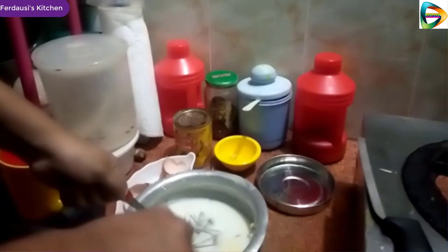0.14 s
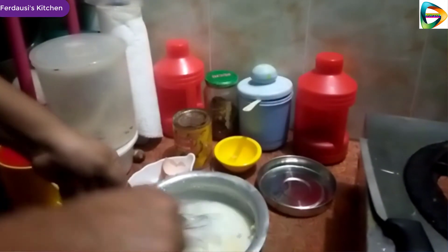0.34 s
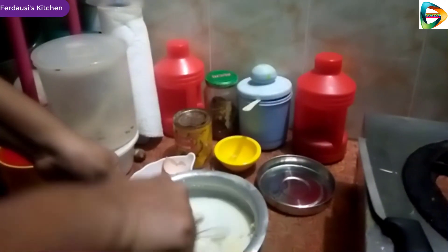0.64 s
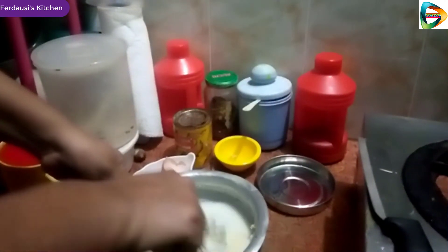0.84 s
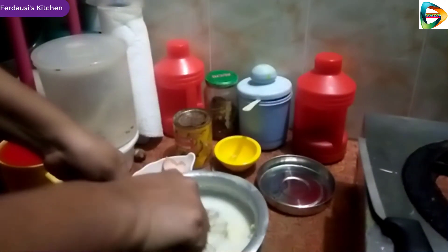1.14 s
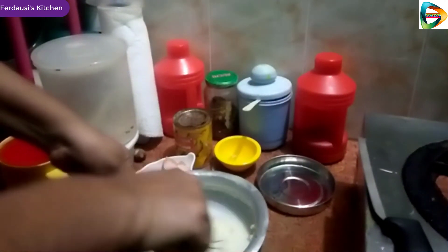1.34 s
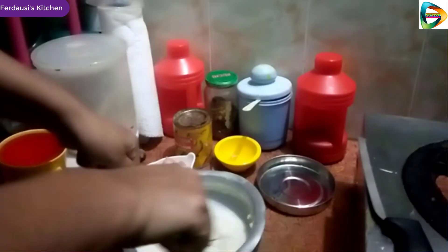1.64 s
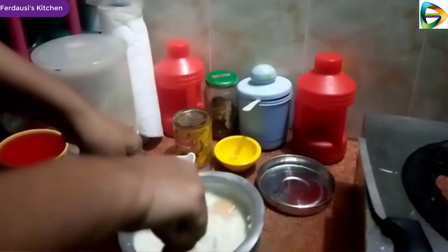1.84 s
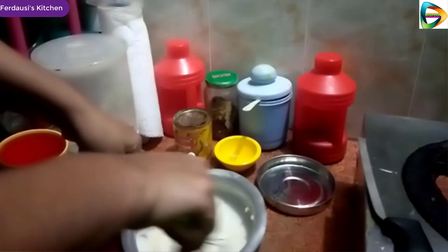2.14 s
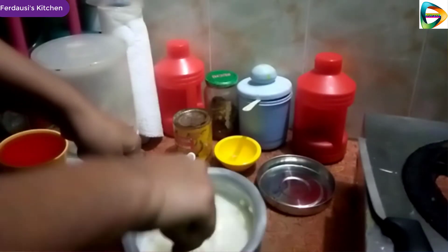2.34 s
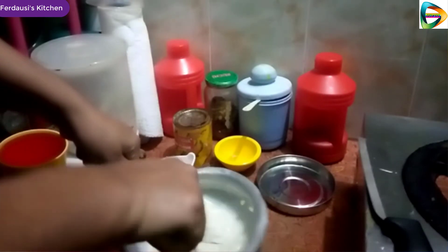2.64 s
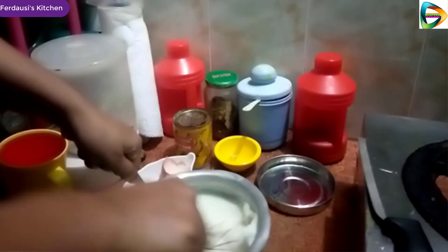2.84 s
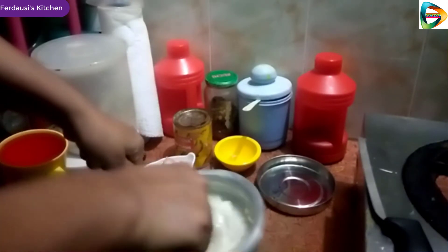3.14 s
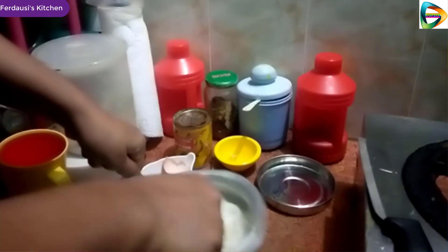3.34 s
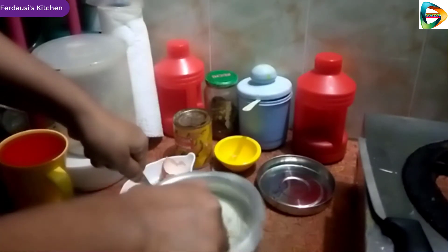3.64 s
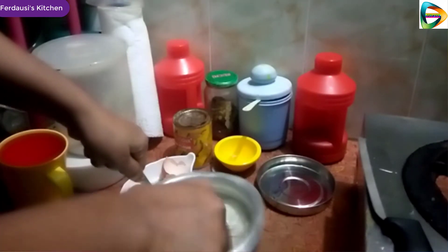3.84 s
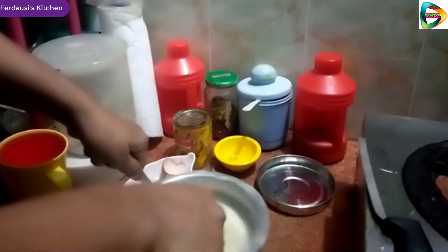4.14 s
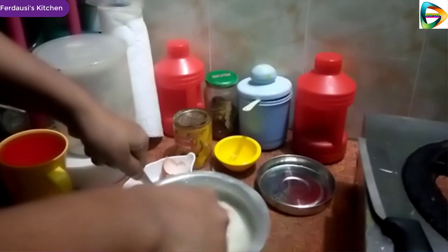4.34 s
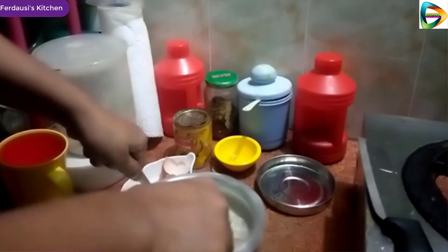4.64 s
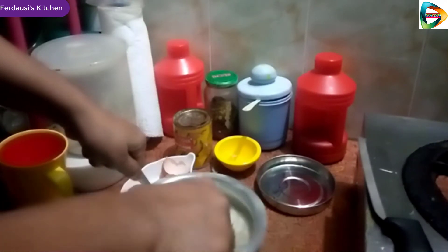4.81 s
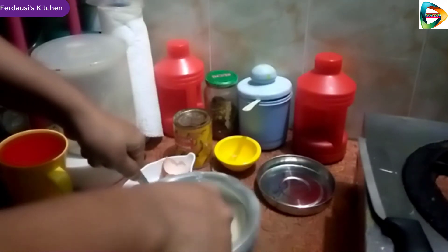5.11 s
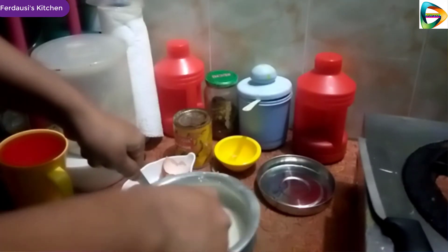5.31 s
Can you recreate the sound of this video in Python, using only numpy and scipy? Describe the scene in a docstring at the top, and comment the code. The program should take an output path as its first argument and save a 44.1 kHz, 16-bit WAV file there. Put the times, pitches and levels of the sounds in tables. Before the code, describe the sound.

A close, single-channel sound of whisking in a small tiled kitchen with short lively echoes and faint steady room noise. From 0 to about 3.3 seconds, wet wires scrape along a steel bowl three to five times a second: gritty, swelling metallic swishes centred around 4 to 7 kHz with some fine hiss, and only faint ticks between. They strengthen from 1.7 seconds and peak near 2.5 to 2.7. At 3.45 a sudden, very loud bright clink begins a run of strikes, at about 3.68 (a double hit), 3.9, 4.1, 4.3 and 4.5, then a weaker one at 4.7 and a last strong one at 5.04. Each is a crisp crack with wire buzz and brief damped ringing. Little rising plops and froth surround them, most noticeable at 3.7 to 3.8. Dull low bumps of the bowl come at times, a soft gulp at 5.2, and a light scrape ends it. The loudest hits slightly overload the microphone.

```python
"""In a small tiled kitchen a wire whisk stirs runny egg batter in a steel bowl on the counter.
At first the wires scrape the wall several times a second: slip noise drives broad resonances.
From about 3.4 s they strike it in bright clinks: noise bursts over decaying sine modes.
The batter plops and froths (gliding sines), the bowl rocks dully on the counter (low noise),
faint room noise stays steady, and the loudest clinks overload the microphone."""
import sys
import numpy as np
from scipy import signal
from scipy.fft import rfft, irfft
from scipy.io import wavfile
from scipy.ndimage import uniform_filter1d

SR = 44100
rng = np.random.default_rng(int(sys.argv[2]) if len(sys.argv) > 2 else 0)


def pcm_store(signal):
    """Save signal as 16-bit PCM."""
    levels = np.round(np.clip(np.atleast_2d(signal), -1, 1) * 32767)
    wavfile.write(sys.argv[1], SR, levels.astype(np.int16).T)


N = 241094
T = np.arange(N) / SR

# Wire strikes on the bowl. Each row: start in seconds, relative level in dB, bowl rim in dB re level,
# wire tips in dB re level, 60 dB decay of the buzz in seconds, loop pitch in Hz, loop in dB re level.
BLOWS = [(0.012, -51, 4, 6, 0.018, 2220, 3), (.011, -50, -2, -5, 0.033, 6340, 7.5),
         (0.011, -50.5, -18, 11, 0.025, 15000, 18), (.408, -42, 3, 1.5, 0.011, 3740, 3.5),
         (0.409, -45.5, -12, -20, 0.028, 6430, 10), (0.72, -50.5, -18, -17, .02, 4900, 3.5),
         (.885, -40, -23, -22, 0.061, 2440, -12), (1.271, -38, -10, -4, 0.028, 2940, -7),
         (2.44, -37, -10, -14, 0.056, 6350, -10), (2.646, -39.5, -4.5, -15, .08, 4450, 2),
         (2.74, -48.5, -19, -27, .02, 4550, 5), (2.894, -50.5, 4, -16, 0.033, 5020, 5.5),
         (3.125, -40, -1, -23, 0.11, 3060, 4), (3.263, -39, -15, -24, .015, 3110, 0.5),
         (3.365, -44.5, -6.5, -31, 0.098, 5300, 11), (3.4527, -8.5, -8.5, -7, 0.046, 3940, -8),
         (3.6738, -18, -12, -3.5, 0.015, 3230, -6.5), (3.681, -15, -11.5, -6.5, 0.069, 4560, -5.5),
         (3.882, -13.5, -10, -11.5, 0.035, 3890, -12), (4.086, -19, -8.5, -14, 0.048, 4150, -7.5),
         (4.285, -15.5, -7, -11.5, 0.028, 4520, -12), (4.378, -36.5, -22, -25, 0.0084, 4580, -1.5),
         (4.4762, -13.5, -8, -7, 0.015, 5250, -2), (4.5078, -21, -31, -16, 0.063, 5560, -3),
         (4.697, -31, -9.5, -13, 0.016, 6120, 2), (4.862, -50.5, 3, -19, 0.057, 4170, -2),
         (4.956, -55.5, -7, -19, .04, 6200, 9), (5.043, -10.5, -7, -11, 0.029, 5500, -4.5)]


def undb(db):
    """Decibels to gain."""
    return 10 ** (np.asarray(db) / 20)


def unit(x):
    """Scale to rms 1."""
    return x / np.sqrt(np.mean(x ** 2))


def fade(t, t60_s):
    """Exponential decay, 60 dB down after t60_s."""
    return np.exp(-np.log(1000) * t / max(t60_s, 1e-3))


def add(out, start_s, x):
    """Mix x into out from start_s on."""
    i = max(int(start_s * SR), 0)
    out[i:i + len(x)] += x[:max(N - i, 0)]


def through(x, response):
    """Convolve, keeping the length."""
    return signal.fftconvolve(x, response)[:len(x)]


def colour(x, points, size=1024):
    """Minimum-phase filter with a spectrum of (Hz, dB) points, built by folding the cepstrum."""
    hz, db = np.transpose(points)
    f = np.maximum(np.fft.rfftfreq(size, 1 / SR), 1)
    log_gain = np.log(undb(np.interp(np.log(f), np.log(hz), db)))
    cepstrum = irfft(log_gain)
    cepstrum[1:size // 2] *= 2
    cepstrum[size // 2 + 1:] = 0
    return through(x, irfft(np.exp(rfft(cepstrum))))


def resonate(x, peaks):
    """Drive (Hz, width Hz, dB) resonances; the t * exp envelope gives them steep skirts."""
    t = T[:SR // 20]
    response = np.zeros(len(t))
    for hz, width_hz, db in peaks:
        envelope = width_hz ** 2 * t * np.exp(-np.pi * width_hz * t)
        response += undb(db) * envelope * np.sin(2 * np.pi * hz * t)
    return through(x, response)


def wander(rate_hz, size=N):
    """Random levels, new ones rate_hz times a second, joined by straight lines."""
    knots = rng.standard_normal(N // 100)
    return np.interp(T[:size] * rate_hz, np.arange(len(knots)), knots)


def burst(t60_s, rise_s):
    """A short run of irregular contacts: noise that rises fast and decays."""
    t = T[:SR // 2]
    return rng.standard_normal(len(t)) * fade(t, t60_s) * (1 - np.exp(-t / rise_s))


def kitchen(t60_s=0.38, treble_t60_s=0.27, wet_db=3):
    """Response of the tiled room: direct sound, then uneven echoes that grow duller."""
    t = T[:SR // 2]
    # hard tiles return the sound in clumps of a millisecond or two
    clumps = undb(3 * wander(700, size=len(t)))
    echoes = rng.standard_normal(len(t)) * clumps * (t > .002)
    low = signal.sosfiltfilt(signal.butter(2, 8000, fs=SR, output="sos"), echoes)
    tail = low * fade(t, t60_s) + (echoes - low) * fade(t, treble_t60_s)
    return (t == 0) + undb(wet_db) * tail / np.linalg.norm(tail)


def pluck(hz, width_hz, t60_s, room):
    """One damped resonance set going by a burst and heard in the room; rms 1 over its first 50 ms."""
    sound = through(resonate(burst(t60_s, rise_s=0.00022), [(hz, width_hz, 0)]), room)
    return sound / sound[:SR // 20].std()


def air(level_db=-58):
    """Faint steady noise of the room."""
    # Each row: frequency in Hz, level in dB.
    air_spectrum = [(40, -9.5), (120, -1.5), (260, -4.5), (550, -1.5), (750, -10), (1200, -9), (2000, -16),
                    (5000, -13.5), (8000, -45), (16000, -35)]
    return undb(level_db) * unit(colour(rng.standard_normal(N), air_spectrum))


def counter():
    """The bowl and the leaning hand shake the worktop: low noise swells at each rock."""
    # Bowl tipping on the counter. Each row: time of the peak in seconds, level in dB.
    rocking = [(.36, -58), (1.36, -48.5), (1.535, -42.5), (2.4, -56), (2.46, -46.5), (2.84, -47),
               (2.97, -42), (3.5, -49), (4.46, -43), (4.57, -49), (5.0, -44.5), (5.235, -42.5)]
    # Spectrum of the worktop. Each row: frequency in Hz, level in dB.
    worktop = [(25, -34), (38, -34), (49, 2.5), (62, -10.5), (77, 8), (95, -5.5), (115, -1.5), (150, 0.5),
               (190, -15.5), (300, -20.5), (700, -65.5)]
    rock_s = 0.039  # time to tip, and as long to settle
    tremble_db, tremble_db_per_s = -58.5, 1.83  # trembling grows steadily
    rock_power = sum(undb(db) ** 2 * np.exp(-((T - s) / rock_s) ** 2) for s, db in rocking)
    tremble = undb(tremble_db + tremble_db_per_s * T)
    shake = np.sqrt(rock_power + tremble ** 2)
    return shake * unit(colour(rng.standard_normal(N), worktop, size=8192))


def bowl_ring(t60_s=0.068):
    """Modes of the steel wall, damped by the batter; its sloshing shifts them from blow to blow."""
    # Ring of the bowl. Each row: frequency in Hz, level in dB before a random offset.
    bowl_modes = [(880, -17.5), (1060, -32), (1320, -16.5), (1540, -15), (2020, -16), (2475, -5), (2555, 0),
                  (3100, -4.5), (3245, 2.5), (3775, 6), (4015, 7.5), (4125, -9), (4330, 5.5), (4565, 7),
                  (4651, 2.5), (4905, 3), (5085, -26), (5230, -29), (5362, -20.5), (5550, 12), (5660, -13),
                  (5848, 0), (6375, 1), (6550, 6.5), (6657, 1.5), (7224, -23), (7585, 3), (8490, -20)]
    t = T[:SR // 2]
    size, shift, phase = rng.uniform(-0.95, 1, (3, len(bowl_modes), 1))
    hz, db = np.transpose(bowl_modes)[:, :, None]
    shifted_hz = hz * (1 + .003 * shift)
    modes = undb(db + 4 * size) * np.sin(2 * np.pi * shifted_hz * t + np.pi * phase)
    return modes.sum(axis=0) * fade(t, t60_s) * (1 - np.exp(-t / 0.002))


def clink(levels_db, buzz_s, ring_db=-3, crack_db=-2):
    """Wires crack on steel and buzz, the bowl rings on; the strike point sets each region's share."""
    # Rim, wall, wires, wire tips. Each row: low edge in Hz, high edge in Hz.
    regions = [(2200, 3500), (3700, 5000), (5000, 7500), (9000, 16000)]
    # Dense resonances of the wire loops. Each row: frequency in Hz, level in dB.
    wire_spectrum = [(150, -25.5), (650, -42.5), (950, -23), (1450, -21), (2200, -29), (2550, -11),
                     (3550, -11), (4050, 0.5), (6600, 7), (8000, -11), (9000, -23.5), (13600, -32.5),
                     (15100, -15), (16000, -23)]
    wires = through(colour(burst(buzz_s, rise_s=0.0021), wire_spectrum), kitchen(wet_db=13))
    t, contact_s = T[:len(wires)], .005  # first hard contact
    contact = np.where(t < contact_s, np.sin(np.pi * t / contact_s), 0)
    crack = colour(contact * rng.standard_normal(len(wires)), wire_spectrum)
    ring = through(bowl_ring(), kitchen(wet_db=-6.5))
    sound = unit(wires) + undb(ring_db) * unit(ring) + undb(crack_db) * unit(crack)
    attack = sound[:SR // 40]
    # gain that brings each region of the attack to its level
    shares = []
    for (low_hz, high_hz), db in zip(regions, levels_db):
        bandpass = signal.butter(4, (low_hz, high_hz), "band", fs=SR, output="sos")
        gain_db = db - 20 * np.log10(signal.sosfilt(bandpass, attack).std())
        shares += [(low_hz, gain_db), (high_hz, gain_db)]
    return colour(sound, shares)


def beating(level_db=-2, pings_db=-1):
    """Every blow of the whisk on the bowl, and the wet loops that ring broadly and briefly."""
    wall_db = -4  # bowl wall re wires, in every blow
    loop_width_hz, loop_buzz_s = 374, 0.024
    clinks, loops = np.zeros(N), np.zeros(N)
    for start_s, db, rim_db, tips_db, buzz_s, hz, loop_db in BLOWS:
        add(clinks, start_s, clink(db + np.array([rim_db, wall_db, 0, tips_db]), buzz_s))
        ping = pluck(hz, loop_width_hz, loop_buzz_s, room=kitchen(t60_s=0.35, wet_db=0.0))
        add(loops, start_s, undb(db + loop_db) * ping)
    return undb(level_db) * clinks + undb(pings_db) * loops


def pressure(roundness=0.91):
    """Gains of wall, rim, hiss: sweeps over a light contact; a graze leads into each blow."""
    # Sweeps of the whisk along the wall. Each row: time of hardest pressure in seconds, level in dB,
    # swell time in seconds, rim ring in dB re level, fine hiss in dB re level (before the hiss trim).
    strokes = [(0.202, -39, 0.058, -16.5, -6.5), (.4, -52.5, 0.11, 1.5, -6), (.55, -42.5, 0.079, -22, -27),
               (0.657, -34, 0.047, -17, -4), (0.729, -39, 0.056, -16, -5), (.93, -43, 0.11, -0.5, -11),
               (0.998, -42, 0.069, -3, -8.5), (1.158, -40.5, 0.083, -10, -11),
               (1.301, -34.5, 0.11, -8.5, -6), (1.39, -40.5, 0.055, -12, -13),
               (1.687, -33, 0.073, -10, -11.5), (1.963, -34, 0.091, -11, -11),
               (2.213, -33, 0.083, -6.5, -9.5), (2.36, -47.5, 0.072, -5.5, -15),
               (2.461, -28, .05, -12.5, -7), (2.673, -27, 0.054, -5, -8.5), (2.922, -36, 0.06, -8, -7),
               (3.042, -53, 0.047, -2, 3), (3.137, -33, 0.058, -4, -4), (3.29, -45.5, 0.075, -16, -21),
               (3.39, -43.5, 0.23, -10, -9), (4.9, -56, 0.054, 2.5, 4), (5.03, -43, 0.088, -6, -10),
               (5.454, -45.5, 0.094, -8, -4.5)]
    # Whisk resting lightly on the wall. Each row: start in seconds, end in seconds.
    touching = [(.5, 1.42), (1.7, 3.45), (4.8, 5.7)]
    touch_db, touch_rim_db, touch_hiss_db = -57.5, -12.5, -19.5  # rim and hiss re touch
    swell_db, release_ratio = 22, 1.366  # rise within the swell time; fall time / swell time
    graze_db, graze_swell_s = -19.5, 0.016  # re the blow
    touch = sum(1. * ((T > start_s) & (T < end_s)) for start_s, end_s in touching)
    touch = uniform_filter1d(touch, SR // 20)
    touch_levels_db = touch_db + np.array([[0], [touch_rim_db], [touch_hiss_db]])
    power = undb(touch_levels_db) ** 2 * np.abs(touch)
    grazes = [(s, db + graze_db, graze_swell_s, rim_db, tips_db) for s, db, rim_db, tips_db, *_ in BLOWS]
    for peak_s, db, swell_s, rim_db, hiss_db in list(strokes) + grazes:
        away = np.maximum(peak_s - T, (T - peak_s) / release_ratio) / swell_s
        near = away < 4
        levels_db = db + np.array([[0], [rim_db], [hiss_db]])
        power[:, near] += undb(levels_db - swell_db * away[near] ** roundness) ** 2
    return np.sqrt(power)


def slips(room, rate_hz, spread_db):
    """Dense tiny stick-slip ticks of uneven size, as the room returns them."""
    size_db = spread_db * np.minimum(rng.exponential(size=N), 4)
    sizes = undb(size_db) * rng.standard_normal(N)
    return through(sizes * (rng.random(N) < rate_hz / SR), room)


def rubbed(peaks, shift_db=6, shift_rate_hz=18):
    """Slips drive the resonances; as the contact point travels, one and then another takes the lead."""
    gains = np.array([undb(db + shift_db * wander(shift_rate_hz)) for _, _, db in peaks])
    voices = []
    for hz, width_hz, _ in peaks:
        ticks = slips(kitchen(wet_db=0.5), rate_hz=600, spread_db=2.5)
        voices.append(unit(resonate(ticks, [(hz, width_hz, 0)])))
    return (gains * np.array(voices)).sum(axis=0) / np.linalg.norm(gains, axis=0)


def scraping(hiss_db=-1, chatter_db=1):
    """Wet wires slip along the steel; each turn of the wrist presses them harder against it."""
    # Resonances of rim and wall. Each row: frequency in Hz, width in Hz, mean level in dB.
    rim_peaks = [(1630, 107, -14), (2535, 260, 2.5), (2708, 146, 1.5), (3180, 200, -9.5), (3440, 200, -8.5)]
    wall_peaks = [(4050, 530, -1), (4450, 190, -10.5), (4907, 720, 2), (5380, 46, -2.5), (5640, 350, -1),
                  (6200, 230, 9.5), (6484, 500, 1), (6740, 200, -3), (7190, 940, -2.5)]
    # Hiss of the wire tips. Each row: frequency in Hz, level in dB.
    hiss_spectrum = [(4000, -49.5), (7000, -20.5), (8300, 8), (9500, -4.5), (11200, -7), (12700, -42),
                     (14000, 1.5), (15200, 9), (16000, 11)]
    wall_gain, rim_gain, hiss_gain = pressure()
    wall = wall_gain * rubbed(wall_peaks)
    rim = rim_gain * rubbed(rim_peaks)
    ticks = slips(kitchen(), rate_hz=1400, spread_db=5.0)
    hiss = hiss_gain * undb(hiss_db) * unit(colour(ticks, hiss_spectrum))
    # the loops take the load one after another
    chatter = undb(chatter_db * wander(90))
    return chatter * (wall + rim + hiss)


def bubble(hz, cycles, glide):
    """An air pocket rings for some cycles and rises in pitch as it nears the surface."""
    t = T[:SR // 10]
    life_s = cycles / hz
    pitch_hz = hz * (1 + glide * np.minimum(t / life_s, 1))
    tone = np.sin(2 * np.pi * np.cumsum(pitch_hz) / SR)
    return tone * fade(t, life_s) * (1 - np.exp(-t / 0.00036))


def batter(froth_db=-34, count=7):
    """Single plops, a spray of small bubbles around every blow, scaled with it, and a gulp."""
    # Air pockets closing. Each row: start in seconds, initial pitch in Hz, level in dB.
    plops = [(0.908, 1558, -40), (2.655, 1658, -35.5), (2.894, 1520, -45), (3.121, 1630, -38),
             (3.69, 1950, -27), (3.765, 1285, -23), (3.984, 1920, -37.5), (4.073, 1240, -33.5),
             (4.105, 1900, -30.5), (4.307, 1256, -37), (4.456, 1086, -34), (4.508, 1830, -30.5),
             (4.64, 1700, -38.5), (4.877, 2040, -36), (5.43, 2330, -37.5), (5.462, 1120, -35)]
    # Pockets pulled open by the whisk. Each row: start in seconds, pitch in Hz, width in Hz, level in dB.
    gulps = [(5.185, 960, 515, -37.5), (5.191, 676, 280, -42)]
    froth_db_per_blow_db, froth_lead_s, froth_spread_s = 0.91, 0.019, 0.058
    bubbles = np.zeros(N)
    for start_s, hz, db in plops:
        add(bubbles, start_s, undb(db) * bubble(hz, cycles=60, glide=.2))
    for blow_s, blow_db, *_ in BLOWS:
        for when, pitch, size in rng.random((count, 3)):
            small = bubble(950 * 2 ** (1.2 * pitch), cycles=36, glide=.25)
            start_s = blow_s - froth_lead_s + froth_spread_s * when
            level_db = froth_db + froth_db_per_blow_db * blow_db + 10 * size
            add(bubbles, start_s, undb(level_db) * small)
    out = through(bubbles, kitchen(wet_db=-2))
    for start_s, hz, width_hz, db in gulps:
        gulp = pluck(hz, width_hz, t60_s=.04, room=kitchen(wet_db=-9))
        add(out, start_s, undb(db) * gulp)
    return out


def scene():
    """Whisk, bowl and batter in a small live room, one channel."""
    return (air() + counter() + beating() + scraping() + batter())[None]


def record(dry, ceiling=0.82, cut_hz=15850):
    """The microphone rounds the loudest peaks and cuts the top."""
    rounded = dry / (1 + (dry / ceiling) ** 4) ** (1 / 4)
    lowpass = signal.ellip(10, .2, 70, cut_hz, fs=SR, output="sos")
    return signal.sosfilt(lowpass, rounded)


dry = scene()
out = record(dry)
pcm_store(out)
```